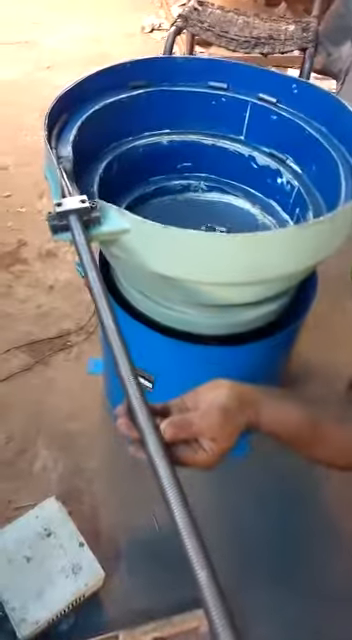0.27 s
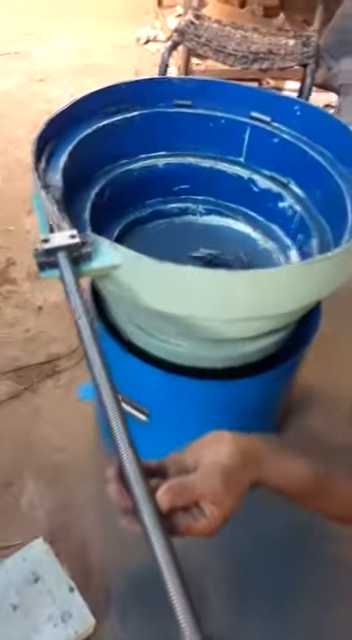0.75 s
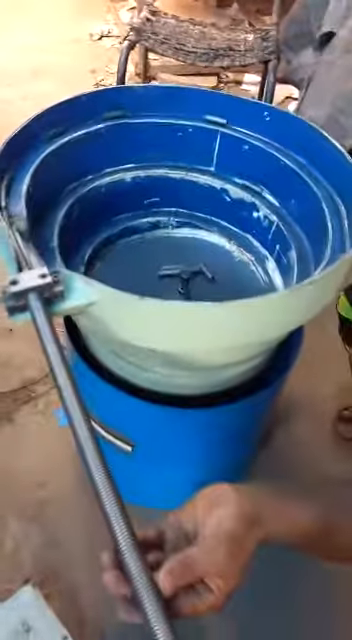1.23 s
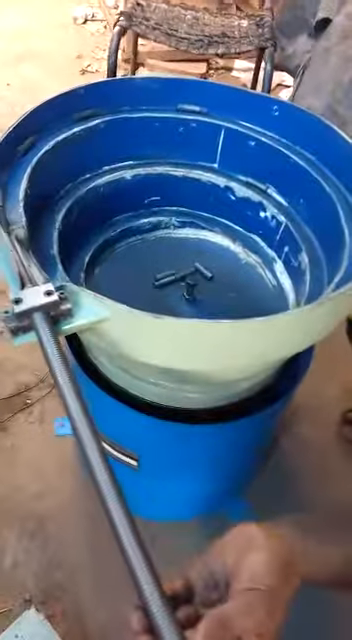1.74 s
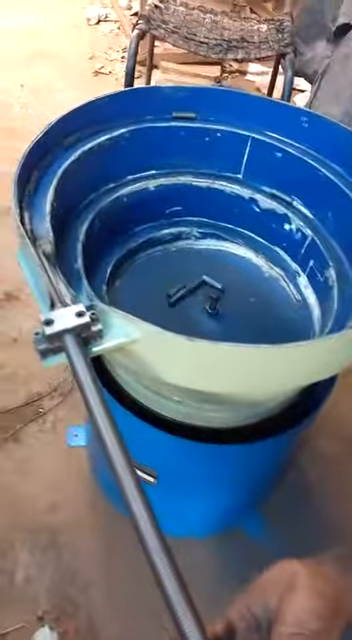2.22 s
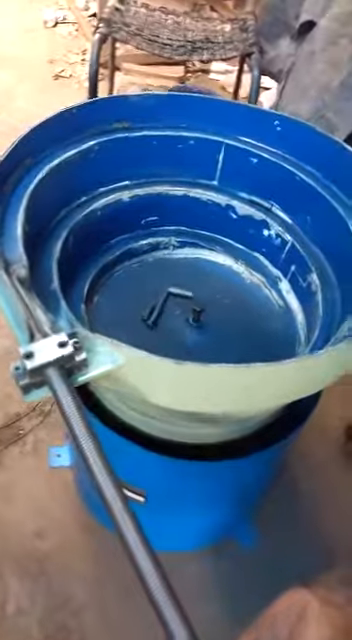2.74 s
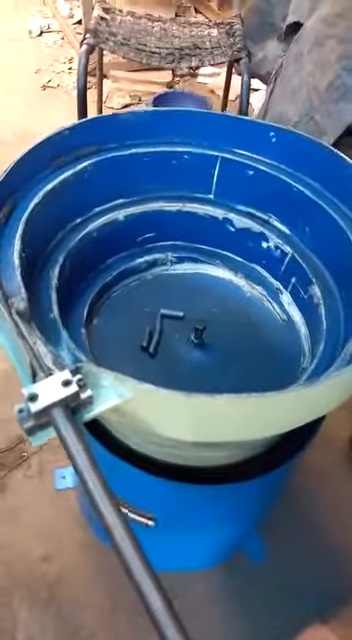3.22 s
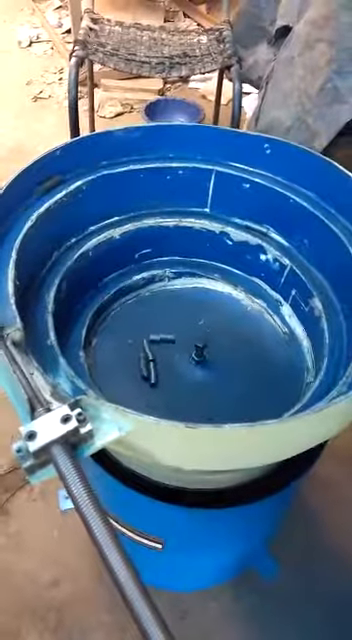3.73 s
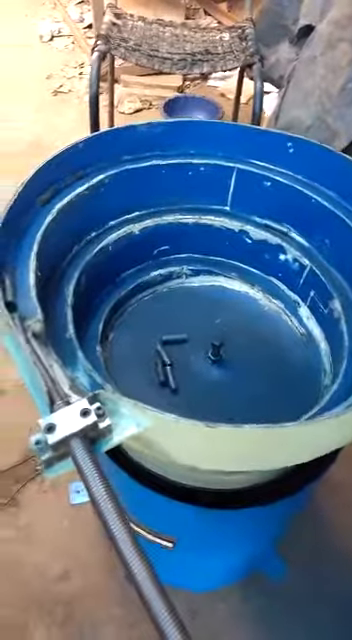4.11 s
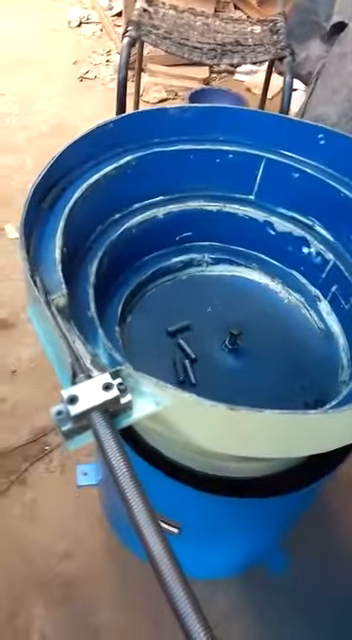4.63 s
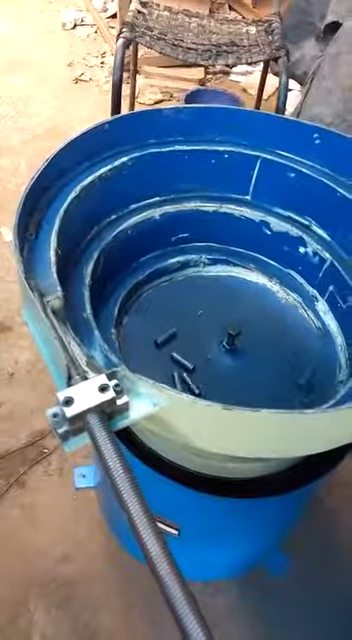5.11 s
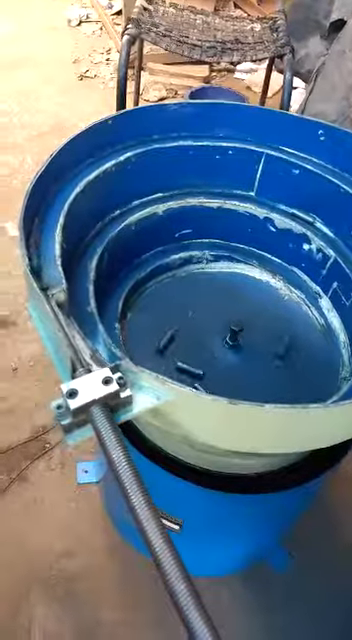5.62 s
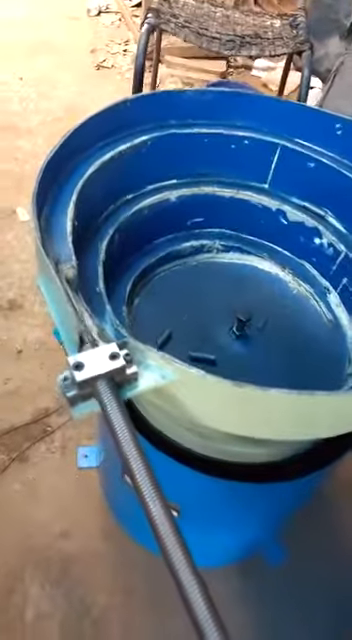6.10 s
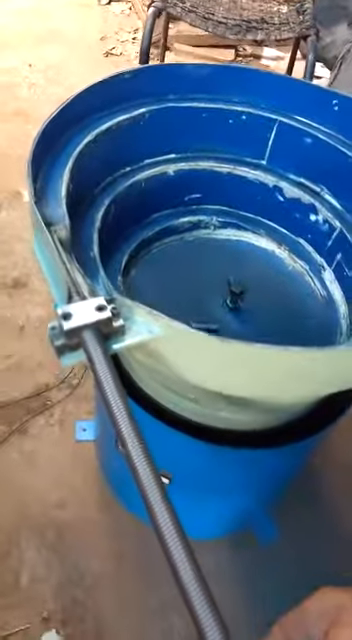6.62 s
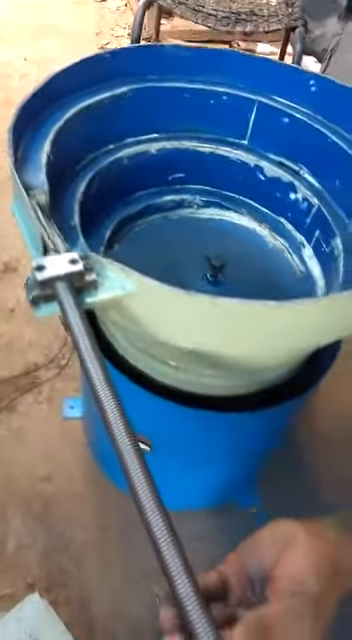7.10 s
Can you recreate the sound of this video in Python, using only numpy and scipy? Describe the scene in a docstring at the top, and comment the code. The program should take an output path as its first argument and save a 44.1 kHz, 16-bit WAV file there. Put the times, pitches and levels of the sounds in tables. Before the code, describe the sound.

Continuous mains-driven droning and dense metallic rattling from a feeder bowl, heard near a small stereo device. Pins land with sharp, dry knocks near the start, then after a gap around two seconds, and more regularly from three seconds on, each followed by lighter ticks and clatter. The loudest distort slightly and duck the background. The room adds only a short, tight reverberation.

```python
"""A mains-driven bowl feeder hums in a small workshop: harmonics of the mains, resonances struck by hops.
Steel pins jittering along its spiral track add a bright sizzle, as filtered random impulses.
Now and then a pin slides out of the delivery tube, knocks hard and bounces: damped modes plus noise.
A low rumble lies beneath, and one faint whine sags in pitch.
Loud knocks overload the recorder, whose gain control ducks and then lets the buzz swell back."""
import sys
import numpy as np
from scipy import signal
from scipy.fft import rfft, irfft
from scipy.io import wavfile
from scipy.ndimage import uniform_filter1d, minimum_filter1d

SR = 44100
rng = np.random.default_rng(int(sys.argv[2]) if len(sys.argv) > 2 else 0)


def to_wav(s):
    """Save 16-bit WAV."""
    ch = np.atleast_2d(s).T  # columns
    pcm = np.round(np.clip(ch, -1, 1) * 32767)  # PCM
    wavfile.write(sys.argv[1], SR, pcm.astype(np.int16))


N = 324576
T = np.arange(N) / SR
FREQS = np.maximum(np.fft.rfftfreq(N, 1 / SR), 1)
MAINS_HZ = 50.03


def from_db(db):
    """Logarithmic level: decibels to amplitude gain."""
    return 10 ** (np.asarray(db) / 20)


def rms_one(x):
    """Normalisation: scale to a root mean square of 1."""
    return x / np.sqrt(np.mean(x ** 2) + 1e-20)


def at_hz(points, hz):
    """Spectral envelope: read a table on a log-frequency axis."""
    f, value = np.transpose(points)
    return np.interp(np.log(hz), np.log(f), value)


def drift(rate_hz):
    """Low-passed noise: slow random variation with spread 1."""
    coarse_t = T[::40]
    hz = np.fft.rfftfreq(len(coarse_t), coarse_t[1])
    spectrum = rfft(rng.standard_normal(len(coarse_t)))
    slow = irfft(spectrum / (1 + (hz / rate_hz) ** 2), len(coarse_t))
    return np.interp(T, coarse_t, rms_one(slow))


def filtered(x, colour):
    """Linear filtering: weight the spectrum by an envelope in dB."""
    return irfft(rfft(x) * from_db(at_hz(colour, FREQS)), N)


def rumble(low_hz, high_hz):
    """Band-limited noise: a low, slightly unsteady rumble, different at each port."""
    rumble_db = -41.5
    band = signal.butter(2, [low_hz, high_hz], "band", fs=SR, output="sos")
    noise = rms_one(signal.sosfilt(band, rng.standard_normal((2, N))))
    return noise * from_db(rumble_db + 2.0 * drift(5.7))


def whine(start_s, end_s, from_hz, to_hz, peak_db, rough_db):
    """Frequency modulation: a faint tone sags in pitch, roughened by random pitch and level."""
    along = np.clip((T - start_s) / (end_s - start_s), 0, 1)
    hz = to_hz + (from_hz - to_hz) * (1 - along) ** 2
    hz = hz * (1 + 0.02 * drift(62))
    level = from_db(peak_db + rough_db * drift(60))
    fade = np.sqrt(np.abs(np.sin(np.pi * along)))
    return level * fade * np.sin(2 * np.pi * np.cumsum(hz) / SR)


# decay of the workshop's reverberation: (f/Hz, t60/s)
ROOM_T60 = [(200, 0.25), (800, 0.2), (2000, 0.089), (4000, 0.26), (8000, 0.15), (14000, 0.2)]


def workshop(x, build_s):
    """Reverberation: diffuse reflections, different at each port, decay exponentially band by band."""
    t, tail = T[:SR // 2], 0
    edges = np.geomspace(100, 16000, 9)
    for low, high in zip(edges, edges[1:]):
        bandpass = signal.butter(2, [low, high], "band", fs=SR, output="sos")
        band = signal.sosfilt(bandpass, rng.standard_normal((2, len(t))))
        t60 = at_hz(ROOM_T60, np.sqrt(low * high))
        tail = tail + band * np.exp(-np.log(1000) * t / t60)
    build_up = 1 - np.exp(-(t / build_s) ** 2)
    tail = rms_one(tail * build_up) / np.sqrt(len(t))
    return signal.fftconvolve(x[None], tail, axes=1)[:, :N]


def at_ports(x, balance, phase):
    """Interaural-type differences: one sound has another level and phase at each microphone port."""
    half = from_db(at_hz(balance, FREQS) / 2) * np.exp(.5j * at_hz(phase, FREQS))
    return irfft(rfft(x) * np.array([half, 1 / half]), N)


def ring(clicks, hz, t60):
    """Damped resonance: a two-pole mode, silent far below its pitch."""
    r, w = from_db(-60 / (t60 * SR)), 2 * np.pi * hz / SR
    return signal.lfilter([1, 0, -1], [1, -2 * r * np.cos(w), r * r], clicks)


# envelope of the short-lived overtones of a landing: (f/Hz, density level/dB per Hz)
CLACK = [(60, -34), (200, -7), (500, 0), (1000, -3), (2000, 2.5), (2450, -14.5), (3300, -4), (4200, -5.5),
         (4900, -16.5), (6300, -12.5), (7500, -13.5), (11000, -24.5)]
CLACK_DB, CLACK_T60_S = -8, 0.026  # level relative to the ringing modes


def clack(force, colour):
    """High modal density: overtones too dense to tell apart, a short noise burst for each touch."""
    t = T[:len(force)]
    energy_decay = np.exp(-2 * np.log(1000) * t / CLACK_T60_S)
    energy = signal.fftconvolve(force ** 2, energy_decay)[:len(t)]
    fading = np.sqrt(np.maximum(energy, 0))
    hz = np.linspace(0, SR / 2, 257)
    audible_hz = np.maximum(hz, 1)
    gains = from_db(at_hz(CLACK, audible_hz) + at_hz(colour, audible_hz))
    # minimum phase takes the square root of the response, hence the squared gains
    shape = signal.minimum_phase(signal.firwin2(255, hz, gains ** 2, fs=SR), n_fft=4096)
    return rms_one(signal.lfilter(shape, 1, fading * rng.standard_normal(len(t))))


# modes that a landing pin sets ringing: (f/Hz, relative level/dB, t60/s)
KNOCK_MODES = [(202, -32, 0.01), (322, -5, 0.018), (422, -1, 0.014), (491, 5.5, 0.029), (550, -3, 0.015),
               (670, -27, 0.021), (775, -4, 0.057), (845, -2.5, 0.033), (916, -13.5, 0.082),
               (1010, 0.5, 0.032), (1150, -17.5, 0.056), (1208, -4.5, 0.011), (1374, -1.5, 0.11),
               (1552, -0.5, 0.026), (1725, -1.5, 0.086), (1920, 1, 0.022), (2034, 4, 0.014),
               (2250, -9.5, 0.013), (2360, -20, 0.0044), (2660, -6, 0.045), (3080, -2, 0.0022),
               (3235, 0.5, 0.022), (3565, -6, 0.024), (3850, -4.5, 0.026), (4276, -2.5, 0.016),
               (5400, -25, 0.004), (6970, -21.5, 0.004), (8260, -31, 0.0023)]
FAVOUR_DB, FAVOUR_OCTAVES = 6, 0.11  # boost of modes near the struck spot's pitches
CHATTER_S, CHATTER_STRENGTH = 0.0021, 0.29  # strengths relative to a strike of 1
SETTLE_DB, SETTLE_S, BOUNCE_SPREAD_DB = -23, 0.033, 5.5


def knock(level_db, scrape_s, colour, favoured):
    """Modal excitation: a pin scrapes, strikes, chatters and settles; returns lead samples and sound."""
    lead = SR // 200
    t, out = np.arange(-lead, SR // 10) / SR, 0
    chatter = rng.integers(0, 4 * lead, size=120)
    bounces = rng.integers(lead, len(t), size=90)
    scrape = np.maximum(1 + t / max(scrape_s, 1e-4), 0)
    swell = np.where(t < 0, scrape, np.exp(-np.abs(t) / CHATTER_S))
    uneven_db = BOUNCE_SPREAD_DB * rng.uniform(-0.7, 1, len(bounces))
    settling = from_db(SETTLE_DB + uneven_db) * np.exp(-t[bounces] / SETTLE_S)
    touches = np.r_[chatter, bounces]
    strengths = np.r_[CHATTER_STRENGTH * swell[chatter], settling]

    hz, db, t60 = np.transpose(KNOCK_MODES)
    hz = hz * np.exp(0.022 * rng.standard_normal(len(hz)))
    for pitch in favoured:
        # the nearest mode rings at the pitch of the spot that is struck
        hz[np.argmin(np.abs(hz - pitch))] = pitch
    nearness = sum(np.exp(-(np.log2(hz / pitch) / FAVOUR_OCTAVES) ** 2) for pitch in favoured)
    mode_db = db + at_hz(colour, hz) + FAVOUR_DB * nearness
    gains = from_db(mode_db) * rng.choice([-1, 1], len(hz))
    for pitch, gain, decay_s in zip(hz, gains, t60):
        # every touch meets the mode at another point of its shape
        signs = np.sign(rng.random(len(touches)) - .5)
        force = np.bincount(touches, strengths * signs, len(t))
        force[lead] += 1
        out = out + gain * rms_one(ring(force + 1e-18, pitch, decay_s))
    # the clack takes the last mode's force
    out = rms_one(out) + from_db(CLACK_DB) * clack(force, colour)
    # so small a striker radiates no bass, and the contact time dulls the very top
    out = signal.sosfilt(signal.butter(2, [170, 6000], "band", fs=SR, output="sos"), out)
    strike_rms = np.sqrt(np.mean(out[(t >= 0) & (t < .008)] ** 2))
    return lead, from_db(level_db) * out / strike_rms


# pins landing and bouncing; colours are relative to the middle modes: (t/s, level of first 8 ms/dB,
# scrape rise before the strike/s, body level/dB, low ring f/Hz, low ring level/dB, clang f/Hz,
# high ring level/dB)
KNOCKS = [(0.0484, -3, 0.0055, -28, 1176, -13, 1730, -7.5), (0.248, 5, 0.0014, -12, 793, 0.5, 1984, -2),
          (0.2538, 1, 0.00056, -24, 795, -24, 2090, -4), (0.271, -7, 0.017, -12, 836, -9, 1930, -5),
          (0.344, -9.5, 0.0043, -17, 813, 0, 2050, -1), (0.362, -14, 0.0065, -22, 850, 2, 1970, -6),
          (0.384, -15, 0.0039, -23, 820, -3, 1970, -6), (1.931, 7, 0.0016, -7.5, 848, -1, 1870, -20),
          (2.1589, -1, 0.0002, 0.5, 1020, 6.5, 1400, -4.5), (2.1867, -11.5, 0.0059, -12, 895, 5, 1940, -12),
          (2.23, -10.5, 0.0063, -12, 890, -6, 1680, -3), (2.2347, -11.5, 0, -18, 900, 4, 2010, -6),
          (2.239, -15, 0.0023, -12, 890, 2, 2020, -9), (2.268, -16, 0.022, -14, 900, -1, 1990, -11),
          (3.2062, 12, 0.0032, -8, 996, -3.5, 1900, -2.5), (3.243, -5, 0.0015, -16, 905, -5, 1760, -6),
          (3.455, 1.5, 0.0021, -14.5, 755, 3.5, 1399, -23), (3.517, -13, 0.0083, 0, 920, 10, 1950, -4),
          (3.603, -3, 0.0018, -27, 813, -8, 1754, -18), (3.612, -11.5, 0.0063, -19, 1140, -11, 1870, -6),
          (3.622, -13, 0.0019, -16, 1010, -4, 1840, -4), (3.65, -12.5, 0.0042, -19, 900, 0, 1940, -3.5),
          (3.988, 9.5, 0.003, -16, 870, -4, 1930, 6.5), (4.082, -7.5, 0, -6, 1020, -1, 1940, 11),
          (4.152, -10, 0.0038, 4, 900, 9, 1950, -4), (4.208, -5, 0.000005, -10.5, 855, -2.5, 2330, 7),
          (4.6189, 10, 0.0043, -10, 1010, -1.5, 1980, 5.5), (4.762, -17, 0.0076, 4, 855, 5.5, 1950, -16),
          (4.792, -5.5, 0, -21, 806, -0.5, 2010, -12), (4.8065, -11, 0.0077, -8, 850, -8, 1950, -7),
          (4.8353, -16, 0.012, -20, 850, -4, 1980, -6), (4.844, -9, 0.00025, -24, 850, -5, 1980, -11),
          (5.1396, 7.5, 0.0025, -16, 988, -3.5, 2190, 5.5), (5.302, -10, 0.0026, 1, 1010, 2.5, 1750, -24),
          (5.308, -13.5, 0.0021, 2, 1010, 10, 1740, -20), (5.397, -8, 0.0045, -13, 775, 2.5, 2080, -4),
          (5.456, -11.5, 0.00047, -15, 850, -4, 2107, -1.5), (6.0111, 1, 0, 0, 775, 6, 1921, 1.5),
          (6.015, -4.5, 0, 4.5, 925, 6, 1950, -11), (6.022, -6.5, 0, -9, 846, 9, 1950, -17),
          (6.1004, -3.5, 0.006, -11, 796, -1, 1959, -11.5), (6.13, -14, 0.003, -21, 830, -2, 2000, -20),
          (6.2144, -11.5, 0.01, -10.5, 810, 8, 1850, -10), (6.352, -2.5, 0.0057, -14, 850, 0.5, 2034, 0),
          (6.439, -8.5, 0.0059, -17, 845, 4, 2118, -6), (6.474, -18.5, 0.00091, -5, 845, 7, 2000, -16),
          (6.871, 6, 0.0016, -3, 775, 1.5, 1950, -10), (7.074, -2.5, 0.003, -11.5, 845, -3, 1921, -10),
          (7.111, -7.5, 0.00075, 2.5, 845, 10, 1920, -6), (7.116, -11, 0.0021, -11, 845, 12, 1930, -12),
          (7.185, -13, 0.0029, 0, 850, 15, 1920, -6), (7.2844, -2, 0.0015, -9.5, 820, -5.5, 1980, 8.5),
          (7.3362, -10, 0.006, -16, 846, -3, 1960, 4)]
# left minus right level of the knocks: (f/Hz, level/dB)
KNOCK_BALANCE = [(250, -12), (500, -6.5), (850, -9), (1400, -1.5), (2000, 5), (4000, -7.5), (10000, 5)]
# phase by which the left port leads: (f/Hz, phase/rad)
KNOCK_PHASE = [(120, .6), (350, 0), (1150, 0), (1900, -2.7), (2600, -3.3), (3400, -6), (3900, -6.8),
               (4800, -9.2), (5300, -9.8), (6100, -12.4), (7500, -15.7), (9000, -18.8)]


def knocks():
    """Superposition: all the landings add up, with the room's reverberation."""
    out = np.zeros(N + SR)
    for s, level_db, scrape_s, body_db, low_hz, low_db, clang_hz, high_db in KNOCKS:
        colour = [(550, body_db), (750, low_db), (1050, low_db), (1400, 0), (2400, 0), (3100, high_db)]
        lead, one = knock(level_db, scrape_s, colour, favoured=(low_hz, clang_hz))
        start = round(s * SR) - lead
        out[start:start + len(one)] += one
    out = out[:N]
    return at_ports(out, KNOCK_BALANCE, KNOCK_PHASE) + from_db(-13.0) * workshop(out, build_s=0.00019)


def hops(per_s, size_db, sway, throw, flicker_db):
    """Modulated shot noise: two crowds of pins hop, most often on each throw of the bowl.

    The throws come twice a mains cycle, one the stronger."""
    cycle = 2 * np.pi * MAINS_HZ * T
    rate = per_s * np.exp(sway * np.cos(cycle) + throw * np.cos(2 * cycle))
    spread_db = size_db * np.minimum(rng.exponential(1, (2, N)), 4)
    sizes = from_db(spread_db + flicker_db * drift(37))
    return (rng.random((2, N)) < rate / SR) * sizes * rng.choice([-1, 1], (2, N))


# pins crowd together or thin out, and the sizzle follows: (start t/s, length t/s, level change/dB)
FLURRIES = [(0.787, 0.051, 2.5), (1.37, 0.27, -2), (1.646, 0.16, 2), (4.4, 0.18, 1), (4.757, 0.35, 2.5),
            (5.59, 0.4, -0.5), (6.018, 0.23, 3.5), (6.492, 0.24, -1)]
FLURRY_EDGE_S = 0.014


def flurries():
    """Amplitude envelope: changes of sizzle level in dB, each with sloping edges and a hold."""
    total_db = 0
    for s, length, db in FLURRIES:
        inside_s = np.minimum(T - s, s + length - T)
        total_db = total_db + db * np.clip(inside_s / FLURRY_EDGE_S + .5, 0, 1)
    return total_db


# colour of pins ticking on each other: (f/Hz, density level/dB per Hz)
SIZZLE = [(1200, -10), (2450, -12), (3100, -1.5), (3900, 2.5), (4700, -1), (6300, -2.5), (7400, -8.5),
          (8900, -5), (10500, -9.5), (13000, -16.5), (15000, -24), (16000, -43)]


def sizzle():
    """Impulse excitation: the pins' own bright ticks, as coloured shot noise."""
    ticks = hops(per_s=3500, size_db=1.5, sway=0.24, throw=0.33, flicker_db=1.5)
    return rms_one(filtered(ticks, SIZZLE))


# broad colour of the rattling bowl: (f/Hz, density level/dB per Hz)
RATTLE = [(25, -38), (45, -24), (110, -8), (220, 0), (300, -3), (450, 4.5), (800, 2), (1300, 1.5),
          (1950, 5), (2450, -9.5), (3200, -6), (6000, -53)]
# bowl resonances: (f/Hz, width/Hz, level above the broad rattle/dB)
BOWL = [(65, 3.7, 2), (233.2, 3.9, 14.5), (244.6, 16.5, 9), (357, 20, 9.5), (516, 6.1, 9), (735, 24, 8.5),
        (987, 21, 10.5), (1177, 24, 5), (1288, 10, 7.5), (1555, 37, 9), (1617, 17, 6.5)]


def rattle():
    """Forced resonance: the hopping pins make the bowl ring in its modes."""
    impacts = hops(per_s=2200, size_db=2.0, sway=.15, throw=.15, flicker_db=1.0)
    drive = rfft(impacts) * from_db(at_hz(RATTLE, FREQS))
    out = irfft(drive, N)
    for hz, width, db in BOWL:
        # each resonance swells and fades as the pins wander over its nodes
        resonance = irfft(drive / (1 + 2j * (FREQS - hz) / width), N)
        out = out + resonance * (from_db(db) - 1) * from_db(2.0 * drift(5.8))
    return rms_one(out)


# magnet hum: (multiple of the mains, relative level/dB)
HUM = [(1, -12), (2, -15.5), (3, -12.5), (4, 1), (5, -8.5), (7, -7), (8, -7), (10, -19), (11, -6),
       (13, -18), (21, -11.5)]
# course of the hum's level about its reference: (t/s, level/dB)
HUM_LEVEL = [(0, -1.5), (0.7, -1), (1.25, 0.5), (1.7, -1), (2.5, -0.5), (3.1, 1), (3.4, 0.5), (4.2, -2),
             (5.4, -1.5), (7.1, -1)]


def hum(reference_db, waver_db, wander_rad):
    """Harmonic synthesis: the magnet shakes the bowl at mains multiples; the shifting load wavers each."""
    total = 0
    for k, db in HUM:
        level = np.sqrt(2) * from_db(db + waver_db * drift(1.7))
        phase = 2 * np.pi * (round(k) * MAINS_HZ * T + rng.random()) + wander_rad * drift(0.91)
        total = total + level * np.sin(phase)
    return from_db(reference_db + np.interp(T, *np.transpose(HUM_LEVEL))) * total


# the feeder and its reflections at the two ports:
# (f/Hz, likeness 0-1, phase by which the left leads/rad, left minus right level/dB)
FEEDER_PORTS = [(60, 0.654, -2.49, -3.1), (200, 0.926, -0.04, 0.4), (350, 0.903, -0.58, 7.1),
                (480, 0.344, -0.76, 3.3), (720, 0.949, 0.12, -1.9), (850, 0.813, 0.25, -0.8),
                (1050, 0.963, -0.03, -0.4), (1350, 0.803, -0.02, -3.0), (1600, 0.537, 0.56, -5.6),
                (1850, 0.681, 3.56, -1.5), (2150, 0.885, 3.16, -0.4), (2450, 0.997, 3.14, 0.0),
                (2750, 0.796, 3.32, -0.9), (3050, 0.323, 4.94, 0.9), (3400, 0.643, 6.43, -0.6),
                (3800, 0.812, 6.01, -2.8), (4400, 0.037, 5.28, 0.4), (4700, 0.676, 2.36, -2.4),
                (5050, 0.807, 2.77, -0.5), (5700, 0.188, 2.1, -2.6), (6300, 0.75, -0.41, -2.2),
                (6850, 0.232, -0.04, -1.6), (7550, 0.773, 3.0, -0.1), (8150, 0.17, 3.68, 1.2),
                (8750, 0.723, 5.5, 2.2), (9700, 0.388, 7.69, 0.5), (10500, 0.625, 9.31, -0.6),
                (11100, 0.339, 11.21, 0.3), (11700, 0.775, 12.51, -0.4), (12350, 0.25, 14.29, -1.5),
                (12950, 0.803, 15.64, -0.5), (13500, 0.149, 16.75, -2.1), (14050, 0.688, 18.83, -0.9),
                (14700, 0.173, 19.36, -2.8), (15200, 0.567, 21.94, -2.0)]


def spread(pair):
    """Partial coherence: two sounds from all round the bowl reach the ports partly alike."""
    hz, *columns = np.transpose(FEEDER_PORTS)
    likeness, phase, balance = (np.interp(FREQS, hz, column) for column in columns)
    shared, apart = rfft(pair) * np.sqrt([1 + likeness, 1 - likeness]) / np.sqrt(2)
    half = from_db(balance / 2) * np.exp(.5j * phase)
    return irfft(np.array([(shared + apart) * half, (shared - apart) / half]), N)


def feeder():
    """Forced vibration: hum, the bowl ringing under the hopping pins, and their bright sizzle."""
    hum_db, rattle_db, sizzle_db = -34.5, -26.5, -29  # references, before drift and port differences
    pins = from_db(rattle_db) * rattle() + from_db(sizzle_db + flurries()) * sizzle()
    pins = pins * from_db(0.27 * drift(38))  # pins jostle each other
    drone = hum(hum_db, waver_db=1.1, wander_rad=0.11)
    return spread(pins + [drone, np.zeros(N)])


def scene():
    """Superposition: rumble, a brief whine, falling pins and the feeder."""
    tone = whine(start_s=6.34, end_s=6.55, from_hz=610, to_hz=480, peak_db=-27.0, rough_db=-2.5)
    return rumble(low_hz=73, high_hz=230) + tone + knocks() + feeder()


def gain_control(x, limit_db, start_db, hold_s, release_db_per_s, attack_s):
    """Dynamic compression: level above the limit soon pulls the gain down; it holds, then creeps back."""
    window, hold = SR // 125, 2 * int(hold_s * SR / 2) + 1
    power = uniform_filter1d(np.mean(x ** 2, axis=0), window)
    excess = np.maximum(10 * np.log10(np.maximum(power, 1e-12)) - limit_db, 0)
    excess = np.where(T == 0, start_db, excess)  # the gain starts out pulled down
    held = -minimum_filter1d(-excess, hold, origin=hold // 2, mode="nearest")
    release = release_db_per_s * T
    cut_db = np.maximum.accumulate(held + release) - release
    r = np.exp(-1 / (attack_s * SR))
    smooth_db = signal.lfilter([1 - r], [1, -r], cut_db, zi=[r * start_db])[0]
    return x * from_db(-smooth_db)


def record(dry):
    """Compression, clipping and low-pass filtering: gain control, overload, a steep top cut."""
    x = gain_control(dry, limit_db=-7.0, start_db=10.5, hold_s=0.19, release_db_per_s=9.5, attack_s=0.0025)
    x = np.clip(x, -1, 1)  # overload on what slips past the gain control
    cutoff_hz = 15600
    return signal.sosfilt(signal.ellip(14, .1, 90, cutoff_hz, fs=SR, output="sos"), x)


dry = scene()
out = record(dry)
to_wav(out)
```